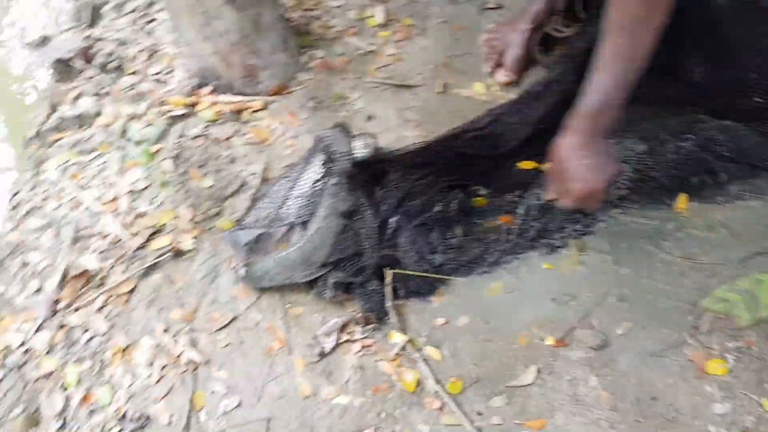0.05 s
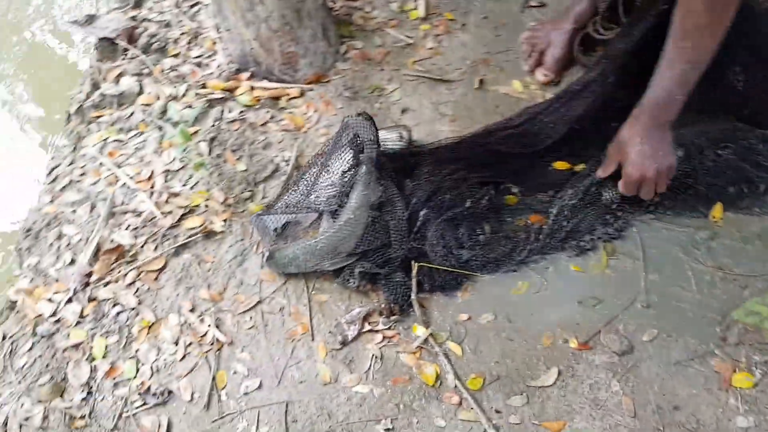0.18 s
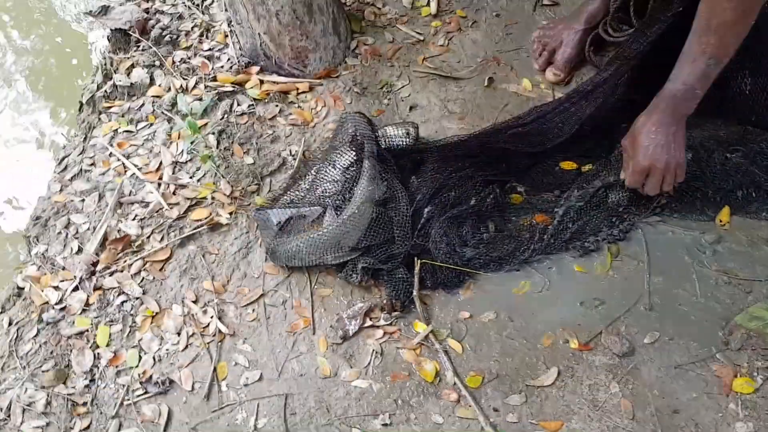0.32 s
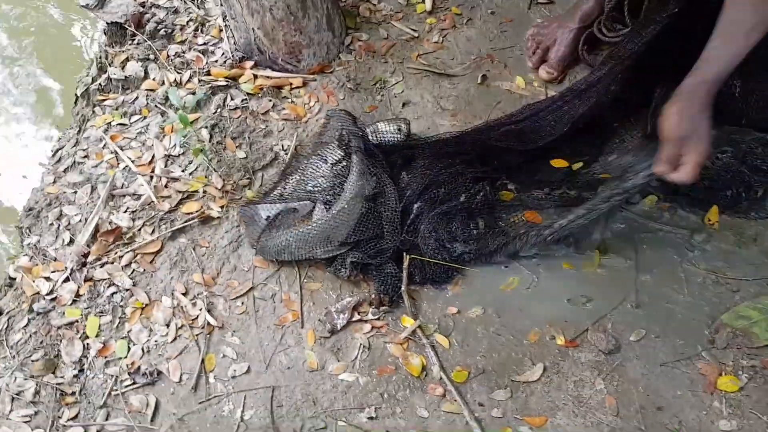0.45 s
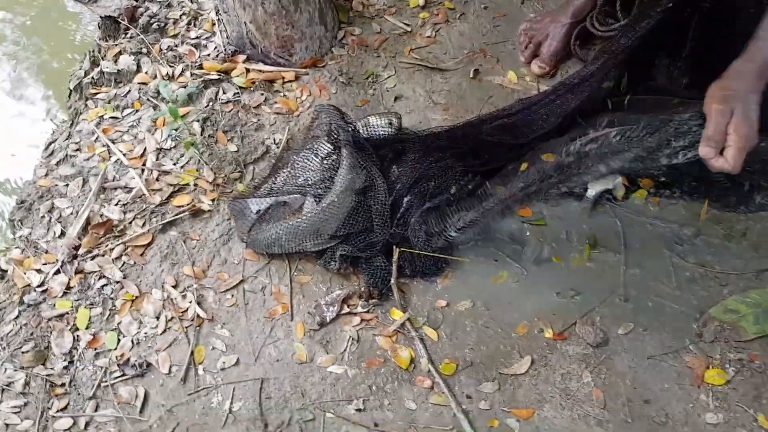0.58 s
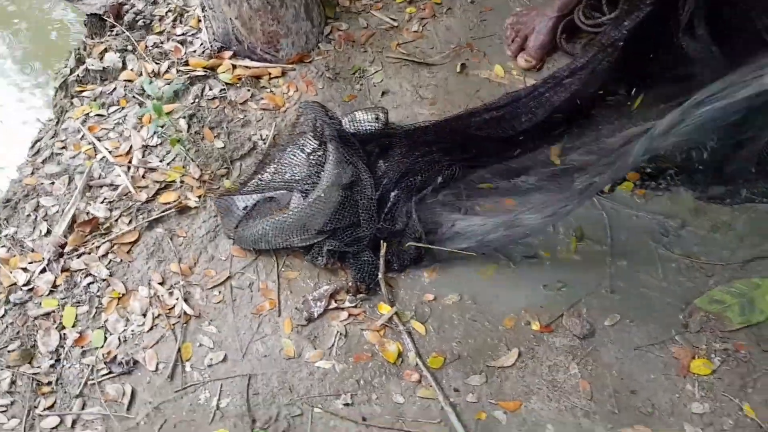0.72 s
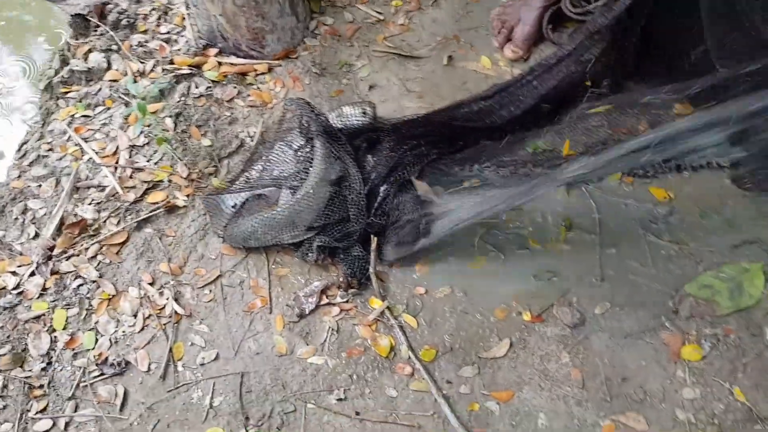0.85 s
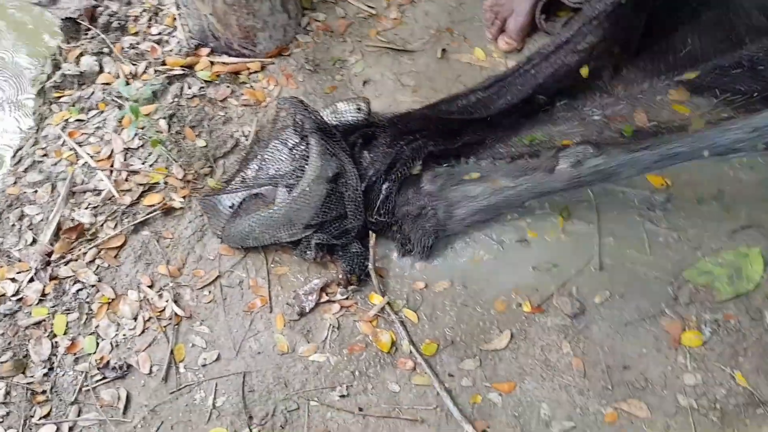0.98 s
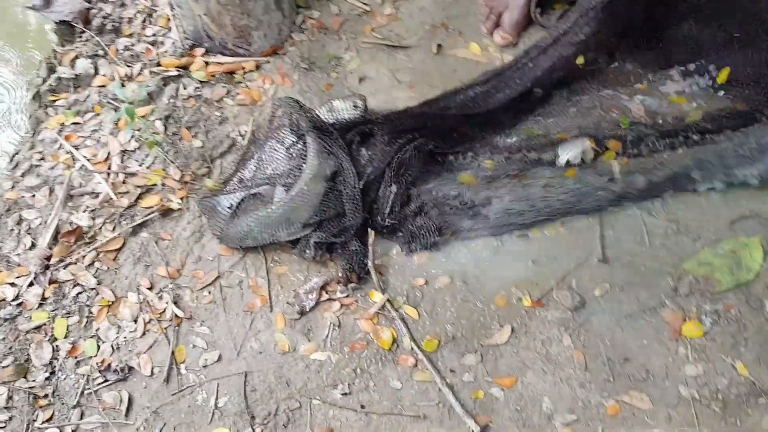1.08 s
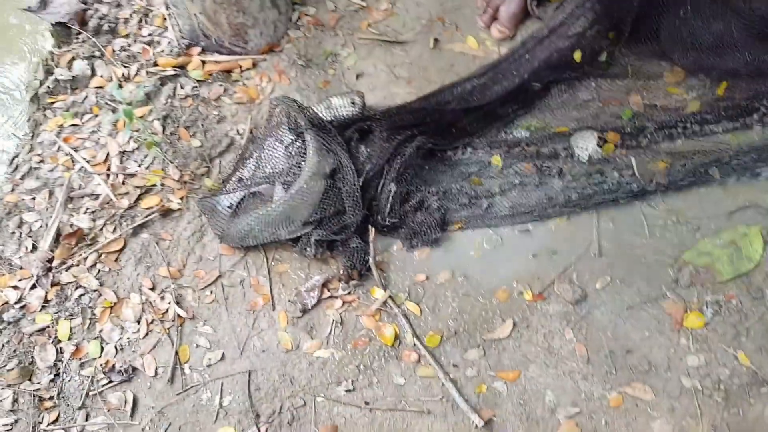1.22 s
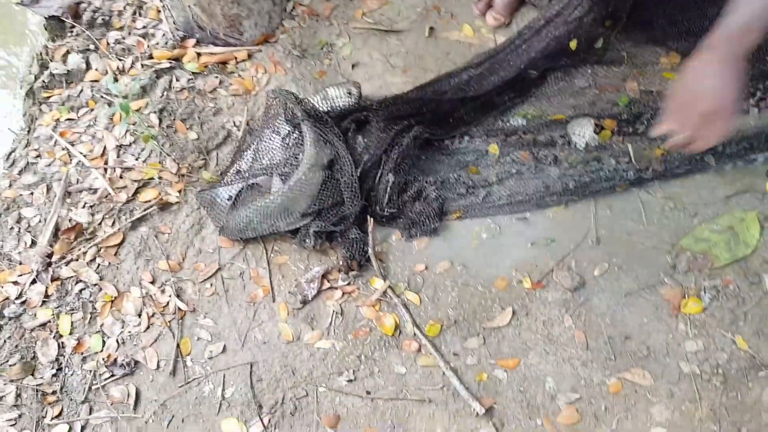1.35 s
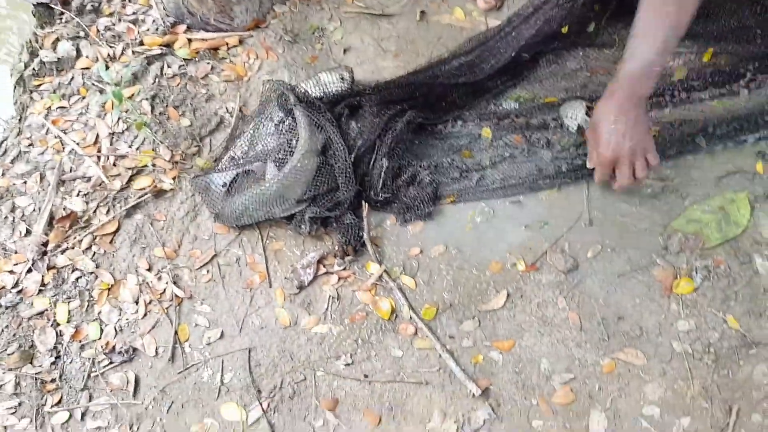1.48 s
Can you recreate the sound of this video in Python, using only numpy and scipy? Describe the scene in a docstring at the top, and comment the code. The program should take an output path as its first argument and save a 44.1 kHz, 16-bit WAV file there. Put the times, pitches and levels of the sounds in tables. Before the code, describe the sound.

A soaked fishing net is pulled through shallow water on a muddy bank: a wet slap, fizzing and trickling drag with gurgling bubbles, then a bright splashy flop. Close stereo pair, faint outdoor rumble and insects.

```python
"""A soaked net on a wet muddy bank, close to a pair of spaced microphones, over steady coloured noise:
distant rumble, faint outdoor hiss and an insect band. First drops and wet mesh slap down: filtered noise bursts.
Then the net drags: dense clicks fizz and trickle, while gliding, dying sines pop and gurgle as air pockets.
Late in the drag more slaps crowd in with bright spray; as the net flops over, the gurgle reaches lower,
swells once more and fades."""
import sys
import numpy as np
from scipy import signal
from scipy.fft import rfft, irfft, next_fast_len
from scipy.io import wavfile
from scipy.ndimage import map_coordinates

SR = 44100
rng = np.random.default_rng(int(sys.argv[2]) if len(sys.argv) > 2 else 0)


def output_pcm(signal):
    """Save a mono or channel-first signal as 16-bit PCM at the path in sys.argv[1].

    Samples are clipped to [-1, 1] before scaling.
    """
    pcm = np.clip(np.atleast_2d(signal).T, -1, 1) * 32767
    wavfile.write(sys.argv[1], SR, np.round(pcm).astype(np.int16))


def voltage_ratio(decibels):
    """Convert decibels (scalar or array-like) to amplitude ratios, 20 dB per decade."""
    exponent = np.asarray(decibels, float) / 20
    return 10 ** exponent


N = 68355
LEFT_RIGHT = np.array([[0.5], [-0.5]])   # splits a left-right difference in dB between the sides


def rms_one(x):
    """Normalisation: equal mean power, so that a level in dB can follow."""
    return x / np.sqrt(np.mean(x ** 2) + 1e-20)


def in_time(rows):
    """Linear interpolation: each column of a table becomes one value per sample."""
    start_s, *columns = np.transpose(rows)
    return [np.interp(np.arange(N) / SR, start_s, column) for column in columns]


def at_hz(points, hz):
    """Logarithmic frequency scale: a table is read by octaves and held level above 15 kHz."""
    table_hz, values = np.array(points).T
    return np.interp(np.log(np.minimum(hz, 15000)), np.log(table_hz), values)


def drift(rate_hz):
    """Low-pass filtered noise: two equal real poles leave a slow random curve of rms 1."""
    r = np.exp(-2 * np.pi * rate_hz / SR)
    curve = signal.lfilter([1], [1, -2 * r, r * r], rng.standard_normal(N + SR))
    return rms_one(curve[SR:])   # skip the filter's start


def colour(x, gain_of_hz):
    """Linear filtering: each frequency of the spectrum is multiplied by its own gain."""
    size = next_fast_len(x.shape[-1] + 2048)
    hz = np.maximum(np.arange(size // 2 + 1) * SR / size, 1)
    return irfft(rfft(x, size) * gain_of_hz(hz), size)[..., :x.shape[-1]]


def alike(three, likeness):
    """Partial coherence: one common and two own signals share the power of the sides by frequency."""
    def share(hz):
        return np.clip(at_hz(likeness, hz), 0, 1)

    common = colour(three[0], lambda hz: np.sqrt(share(hz)))
    own = colour(three[1:], lambda hz: np.sqrt(1 - share(hz)))
    return common + own


def add(out, start_s, sound):
    """Superposition: a sound is summed into the mix at its start, cut at the end of the scene."""
    i = int(start_s * SR)
    out[..., i:i + sound.shape[-1]] += sound[..., :N - i]


# Spectrum of the outdoor floor: pitch_hz [Hz], level_db [dB per Hz, relative]
OUTDOORS_SPECTRUM = [(30, -32), (50, -11.5), (82, 6.5), (105, -8), (152, -1.5), (210, -15), (310, -2),
                     (410, -26.5), (850, -30), (1400, -32.5), (3200, -37), (5200, -35.5), (6500, -21.5),
                     (7300, -20), (8100, -27.5), (10000, -33.5), (13000, -27)]
# Coherence of the outdoor floor: pitch_hz [Hz], common_share [0 to 1, of power]
OUTDOORS_COHERENCE = [(60, 1), (150, 0.8), (300, 0.016), (15000, 0.096)]


def outdoors():
    """Stationary noise: rumble, hiss and an insect band are peaks of one fixed spectrum."""
    air = alike(rng.standard_normal((3, N)), OUTDOORS_COHERENCE)
    return voltage_ratio(-47) * rms_one(colour(air, lambda hz: voltage_ratio(at_hz(OUTDOORS_SPECTRUM, hz))))


# Coherence of the splashing water: pitch_hz [Hz], common_share [0 to 1, of power]
WATER_COHERENCE = [(200, 0.78), (1200, 0.31), (3000, 0.54), (6000, 0.089), (15000, 0.017)]


def water_sides(three):
    """Partial coherence of a near, wide source: the sides share the bass far more than the treble."""
    return alike(three, WATER_COHERENCE)


def grains(per_s, spread_db, channels):
    """Shot noise: independent random clicks of either sign, with exponentially spread levels."""
    sizes = voltage_ratio(spread_db * np.minimum(rng.exponential(1, (channels, N)), 5))
    signs = rng.choice([-1, 1], (channels, N))
    return sizes * signs * (rng.random((channels, N)) < per_s / SR)


def hiss(per_s, spectrum, spread_db, flicker_db):
    """Filtered shot noise: dense droplet clicks fuse into a hiss whose level flickers."""
    drops = water_sides(grains(per_s, spread_db, channels=3))
    shaped = colour(drops, lambda hz: voltage_ratio(at_hz(spectrum, hz)))
    return rms_one(shaped) * voltage_ratio(flicker_db * drift(rate_hz=30))


def pop(hz, t60_s, rise, wobble):
    """Bubble resonance: a dying sine glides by rise octaves per s; level and pitch wobble as its wall shakes."""
    t = np.arange(int(t60_s * SR)) / SR
    level, pitch = (np.interp(t * 300, np.arange(len(w)), w) for w in wobble)   # 300 wobble points per s
    phase = 2 * np.pi * np.cumsum(hz * 2 ** (rise * t + 0.045 * pitch)) / SR
    decay_db = -60 * (t / t60_s) ** 1.35   # power 1 dies evenly; more holds first, then collapses
    onset = 1 - np.exp(-t / 0.00079)
    return np.sin(phase) * voltage_ratio(4.5 * level + decay_db) * onset


def bubbles(per_s, low_hz, late_low_hz, octaves, cycles, spread_db):
    """Random superposition of bubble resonances: smaller ones ring higher and shorter, all rise in pitch."""
    flop_s = 1.11   # once the net flops over, the lowest pitch is late_low_hz
    out, count = np.zeros(N), int(per_s * N / SR)
    for (when, pitch, size, glide), wobble in zip(rng.random((count, 4)), rng.standard_normal((count, 2, 16))):
        start_s = when * N / SR
        low = low_hz if start_s < flop_s else late_low_hz
        hz = low * (low_hz / low * 2 ** octaves) ** pitch   # the highest pitch stays the same
        add(out, start_s, voltage_ratio(spread_db * size) * pop(hz, cycles / hz, 25 * glide, wobble))
    return rms_one(out)


# Spectrum of the trickle's clicks: pitch_hz [Hz], level_db [dB per Hz, relative]
TRICKLE_SPECTRUM = [(710, -10), (1200, -2), (1390, -6), (1740, -5.5), (3060, -3.5), (3700, -5), (4300, -13),
                    (7800, -29)]


def trickle(level_db):
    """Shot noise with bubble resonances: trickling water is midrange clicks plus small ringing droplets."""
    clicks = hiss(3800, TRICKLE_SPECTRUM, spread_db=4.0, flicker_db=2.31)
    droplets = bubbles(500, low_hz=1682, late_low_hz=1682, octaves=1.186, cycles=32, spread_db=43)
    return voltage_ratio(level_db) * (clicks + voltage_ratio(-10.5) * droplets)


# Spectrum of the fizz: pitch_hz [Hz], level_db [dB per Hz, relative]
FIZZ_SPECTRUM = [(2000, -17), (4600, -1.5), (6500, -1.5), (8020, 0), (12000, 1), (15100, -2.5),
                 (16000, -31.5)]


def fizz(level_db, pan_db):
    """Dense shot noise: water fizzes off the dragged mesh, panned by a level difference."""
    return voltage_ratio(level_db + LEFT_RIGHT * pan_db) * hiss(9000, FIZZ_SPECTRUM, spread_db=4.0, flicker_db=1.5)


def gurgle(level_db):
    """Bubble resonance at low pitch: many short bubbles gurgle, the last slosh reaching lower."""
    return voltage_ratio(level_db) * bubbles(370, low_hz=378, late_low_hz=223, octaves=1.51, cycles=17, spread_db=17.5)


# Air pockets: start_s [s], pitch_hz [Hz], level_db [dB, relative], t60_s [s], rise [octaves per s]
AIR_POCKETS = [(.134, 2090, -46, 0.067, 1.5), (.222, 1113, -6, 0.0056, -21), (0.225, 229, -19.5, 0.016, -4),
               (0.27, 1253, -27, 0.07, 2.5), (.269, 557, -32, 0.023, 1), (0.306, 652, -40, 0.18, 10.5),
               (0.379, 720, -29.5, 0.027, 20), (0.392, 1245, -8.5, 0.034, 4), (.429, 768, -26, 0.058, 11.5),
               (.448, 780, -32, 0.12, 5.5), (0.526, 1480, -19, 0.039, -1.5),
               (0.609, 850, -25.5, 0.086, 2.5), (.673, 588, -24.5, 0.04, 9),
               (.694, 625.6, -26.5, 0.19, 27.5), (.72, 570, -29.5, 0.18, 30), (.738, 552, -34, 0.11, -1),
               (.762, 612, -28.5, 0.073, -6), (.795, 707, -25, .05, 10), (0.829, 480, -28.5, 0.12, 9.5),
               (.845, 1965, -23, 0.047, 6.5), (.88, 325, -33, 0.15, 11), (.906, 913, -27.5, 0.025, -7),
               (.922, 890, -25, 0.081, 4.5), (.944, 795, -27.5, 0.048, 6.5), (1.022, 1054, -22.5, 0.03, 15),
               (1.161, 149, -30, 0.048, 4), (1.1785, 753, -16, 0.018, -7), (1.1793, 1045, -15, 0.025, -0.5),
               (1.182, 463, -21, 0.028, -11.5), (1.2125, 520, -21.5, 0.037, -9),
               (1.2128, 880, -21.5, 0.02, 4), (1.238, 438, -23.5, 0.028, -7), (1.253, 286, -23, 0.028, -6)]


def pockets():
    """Bubble resonance: each of the larger air pockets rings once at its own pitch."""
    out = np.zeros(N)
    for start_s, pitch_hz, level_db, t60_s, rise in AIR_POCKETS:
        add(out, start_s, voltage_ratio(level_db) * pop(pitch_hz, t60_s, rise, rng.standard_normal((2, 64))))
    return out


# Wet slaps: start_s [s], level_db [dB, relative], pitch_hz [Hz, band centre], spray_db [dB re crack, relative]
WET_SLAPS = [(0.135, -42, 4800, 1), (0.2254, -1, 3000, -21), (0.2213, -4, 9550, -11),
             (0.228, -13.5, 11800, -9), (0.241, -18, 3400, -24), (0.371, -19.5, 3060, -6),
             (0.391, -15.5, 2960, -0.5), (.392, -15.5, 9940, 0), (0.533, -25.5, 9400, -1),
             (0.575, -6.5, 12600, -14.5), (0.743, -18, 9500, -5.5), (0.7955, -16, 2920, -1.5),
             (0.9344, 6, 8600, -27), (1.0017, -11.5, 8200, -10.5), (1.0248, -11.5, 4370, -20),
             (1.0404, -6.5, 12000, -14), (1.0445, -2.5, 9300, -30.5), (1.1236, -17, 3900, -23),
             (1.151, -19.5, 4000, -23), (1.18, -10.5, 12300, -20.5), (1.226, -13.5, 10500, -8),
             (1.251, 4, 8000, -36), (1.2544, -3.5, 10500, -8), (1.265, -21, 12500, -23),
             (1.269, 1, 11300, -23.5), (1.367, -39.5, 2630, -10.5)]


def slaps(pan_db):
    """Impact noise: a sharp band-centred crack, then clumpy spray whose broad part dies before its centre."""
    crack_t60_s, spray_t60_s, wide_spray_t60_s = 0.005, 0.21, 0.12
    clump_db, clump_points_per_s = 3.5, 230   # drops land in clumps
    out, t = np.zeros((2, N)), np.arange(SR // 4) / SR
    for start_s, level_db, pitch_hz, spray_db in WET_SLAPS:
        uneven = voltage_ratio(6.4 * rng.standard_normal((3, len(t))))
        noise = water_sides(rng.standard_normal((3, len(t))) * uneven)

        def centre(octaves):
            return rms_one(colour(noise, lambda hz: np.exp(-0.5 * (np.log2(hz / pitch_hz) / octaves) ** 2)))

        wide = rms_one(colour(noise, lambda hz: hz ** 2 / (hz ** 2 + 1500 ** 2)))
        clumps_db = clump_db * np.interp(t * clump_points_per_s, np.arange(128), rng.standard_normal(128))
        crack = (centre(octaves=0.41) + voltage_ratio(-9) * wide) * voltage_ratio(-60 * t / crack_t60_s)
        spray = centre(octaves=0.47) * voltage_ratio(-60 * t / spray_t60_s)
        spray = spray + wide * voltage_ratio(1.5 - 60 * t / wide_spray_t60_s)
        add(out, start_s, voltage_ratio(level_db - 10) * (crack + voltage_ratio(spray_db + clumps_db) * spray))
    return out * voltage_ratio(LEFT_RIGHT * pan_db)


# The dragged net: start_s [s], fizz_db [dB], trickle_db [dB], gurgle_db [dB]
NET_DRAG = [(.12, -52, -65, -66), (.21, -48, -60, -58), (.25, -35, -33.5, -51), (.35, -42.5, -48, -59),
            (.43, -34, -35, -42.5), (.51, -37.5, -41.5, -51.5), (.6, -32.5, -35.5, -50),
            (.68, -32.5, -34.5, -38), (.76, -34, -31.5, -40), (.87, -27.5, -27.5, -33),
            (.94, -30, -35.5, -39.5), (.98, -39.5, -37, -42), (1.04, -34, -36.5, -80),
            (1.1, -36.5, -48.5, -54), (1.16, -34, -34, -44), (1.2, -34.5, -39, -44.5),
            (1.25, -20, -27.5, -28), (1.29, -49, -66, -55.5), (1.37, -47, -57.5, -81),
            (1.5, -63.5, -80, -89)]
# Place of the net: start_s [s], left_lag_ms [ms, left after right], pan_db [dB, left-right of fizz and slaps]
NET_PLACE = [(0, -0.36, -3), (.25, -0.33, 3.5), (.9, -0.33, 2), (1.08, -0.33, 1), (1.14, 0.13, 0),
             (1.3, 0.37, -2), (1.55, 0.24, -13.5)]


def scene():
    """Spaced-pair stereophony: the net arrives at the sides at different times, over the outdoor floor."""
    fizz_db, trickle_db, gurgle_db = in_time(NET_DRAG)
    left_lag_ms, pan_db = in_time(NET_PLACE)
    air_sounds = (gurgle(gurgle_db) + pockets()) * voltage_ratio(LEFT_RIGHT * 4.5)   # stronger on the left
    net = trickle(trickle_db) + fizz(fizz_db, pan_db) + air_sounds + slaps(pan_db)
    net[0] = map_coordinates(net[0], [np.arange(N) - left_lag_ms * SR / 1000], order=3)
    return outdoors() + net


# Treble mismatch of the microphones: pitch_hz [Hz], level_db [dB, left-right]
MICROPHONE_TILT = [(5000, -0.5), (8500, 0), (11500, -5.5), (15000, -4)]


def microphones(x):
    """Frequency response: the two microphones differ in the treble."""
    return colour(x, lambda hz: voltage_ratio(LEFT_RIGHT * at_hz(MICROPHONE_TILT, hz)))


def top_cut(x):
    """Nothing passes above the cut-off."""
    return signal.sosfilt(signal.butter(12, 16650, fs=SR, output="sos"), x)


def record(dry):
    """Band limiting and clipping: bottom and top are cut and peaks stop at full scale."""
    x = microphones(dry)
    x = signal.sosfilt(signal.butter(2, 36, "high", fs=SR, output="sos"), x)
    x = signal.sosfilt(signal.cheby2(18, 60, 16300, fs=SR, output="sos"), x)   # 60 dB down from 16.3 kHz
    finished = np.clip(x, -1, 1)
    return top_cut(finished)


dry = scene()
out = record(dry)
output_pcm(out)
```